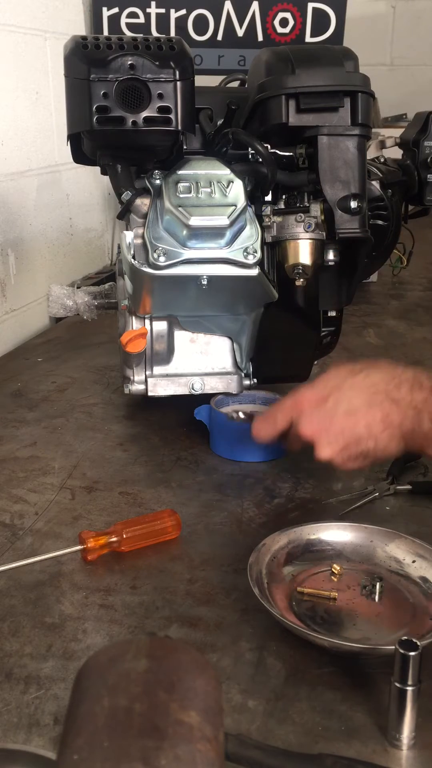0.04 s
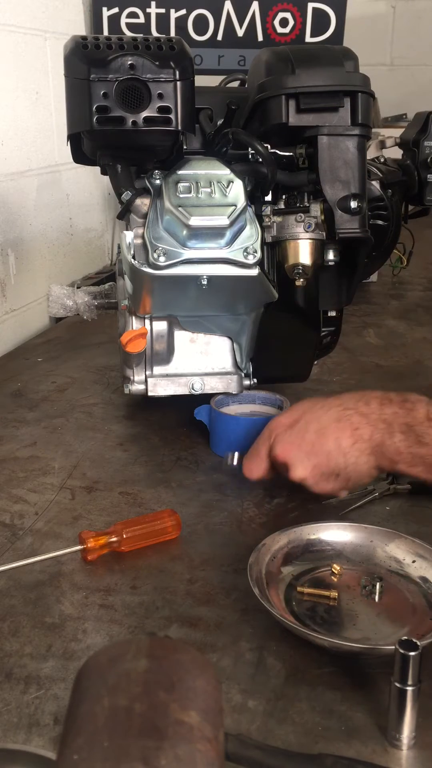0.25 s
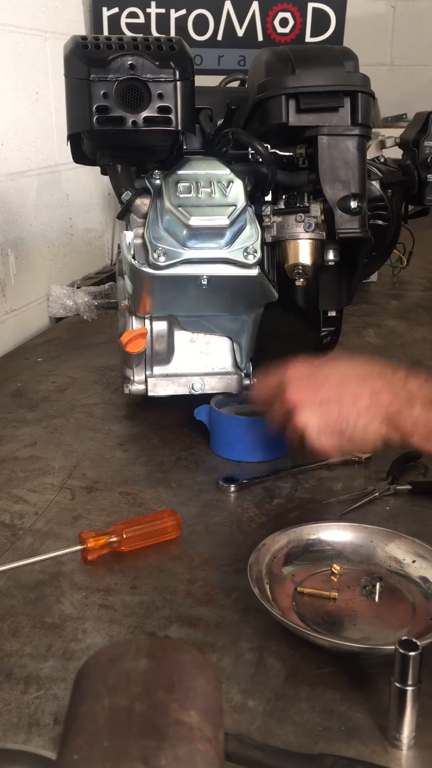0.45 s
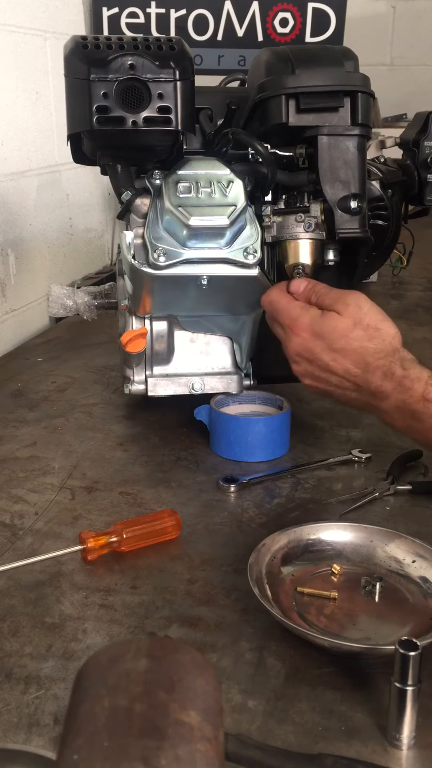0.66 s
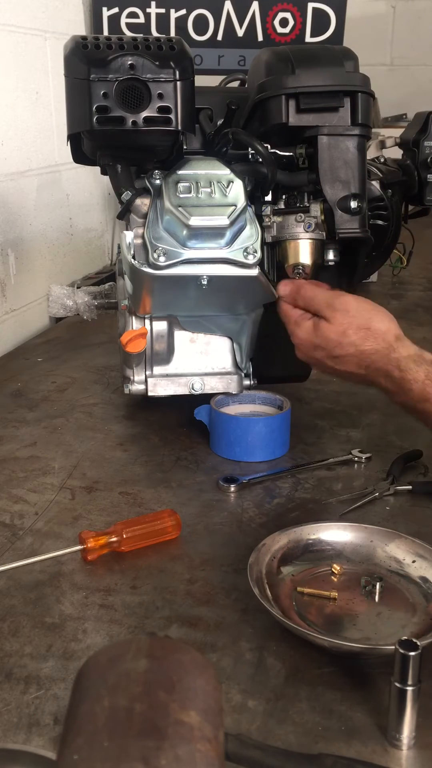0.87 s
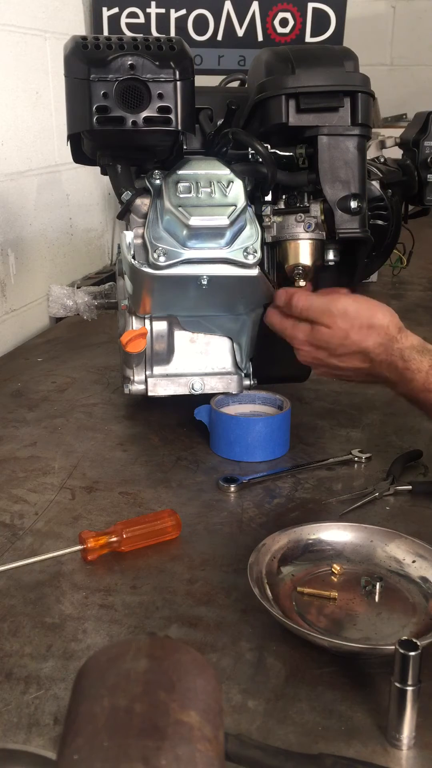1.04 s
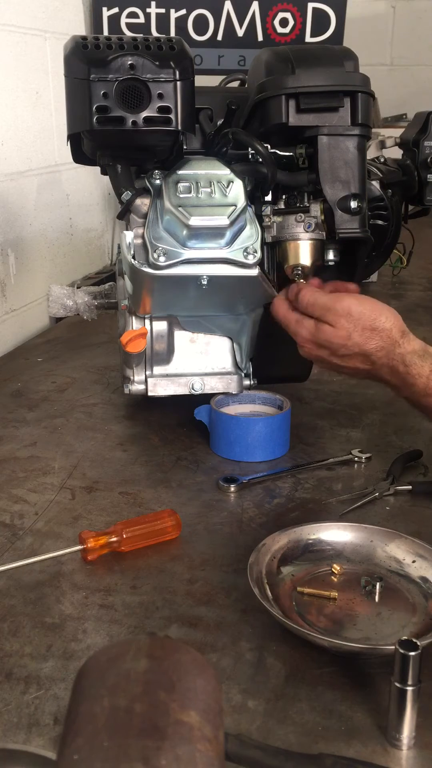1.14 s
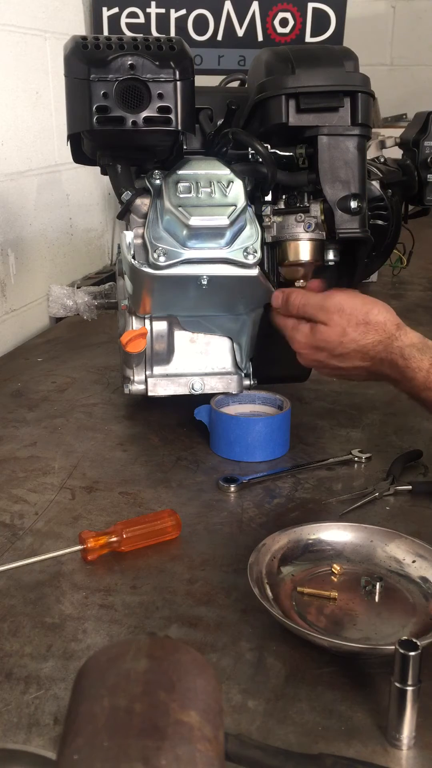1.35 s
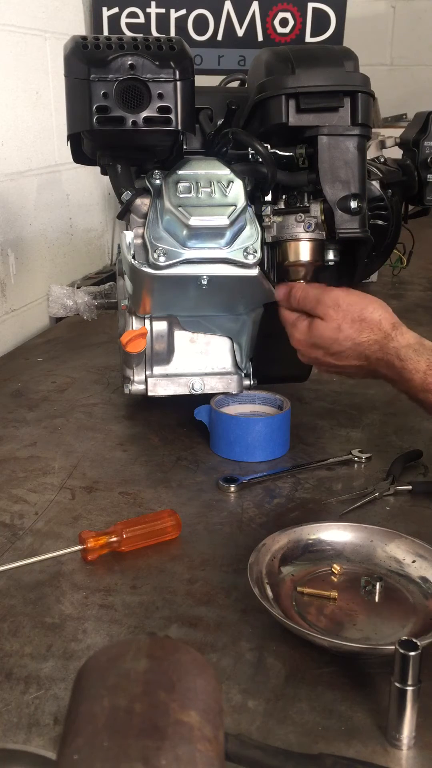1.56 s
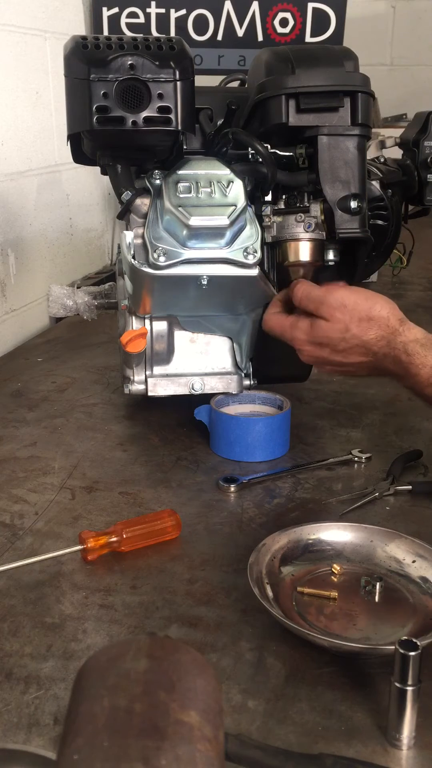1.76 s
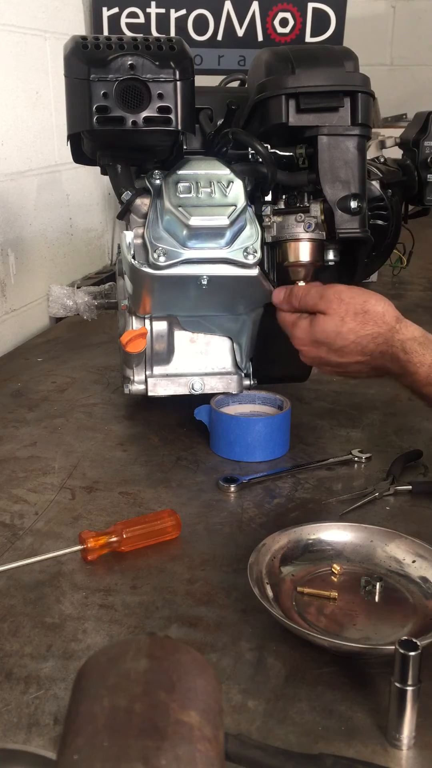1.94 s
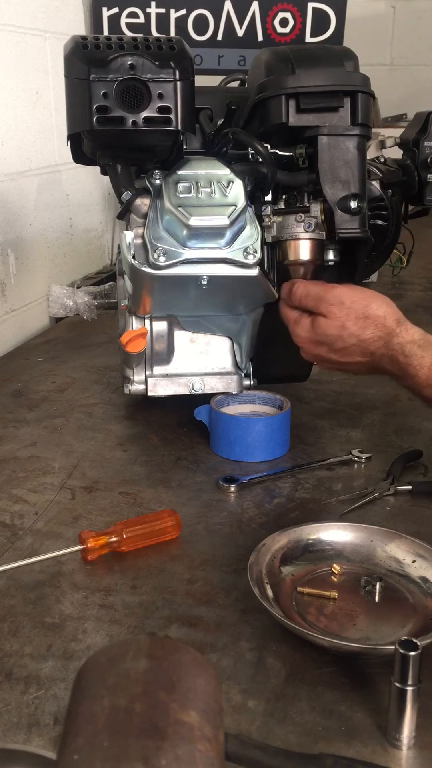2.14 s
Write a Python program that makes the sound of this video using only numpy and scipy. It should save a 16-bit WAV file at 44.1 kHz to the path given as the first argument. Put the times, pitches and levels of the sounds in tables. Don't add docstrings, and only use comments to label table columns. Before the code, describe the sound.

Wrench set down with a sharp double metal clank, followed by faint bolt-turning ticks and tinkles

```python
import sys
import numpy as np
from scipy import signal
from scipy.fft import rfft, irfft
from scipy.io import wavfile
from scipy.ndimage import uniform_filter1d

SR = 44100
rng = np.random.default_rng(int(sys.argv[2]) if len(sys.argv) > 2 else 0)


def convert_level_to_amplitude(level_db):
    exponent = np.asarray(level_db, float) / 20
    return 10 ** exponent


def wrap_up_sound(samples):
    columns = np.atleast_2d(samples).T
    tamed = np.clip(columns, -1, 1)
    steps = np.round(tamed * 32767).astype(np.int16)
    wavfile.write(sys.argv[1], SR, steps)


N = 97020

# f/Hz, level/dB, t60/s
BOWL_MODES = [(8260, -13, 0.07), (8600, -11.5, 0.11), (9180, -15, 0.036), (13000, -14.5, 0.045),
              (13100, -17, 0.088), (15000, -31, 0.035)]
HELD_S = 1.555


def unit(x):
    return x / np.sqrt(np.mean(x ** 2) + 1e-30)


def colour(x, points):
    f_hz = np.fft.rfftfreq(len(x), 1 / SR)
    point_hz, point_db = np.array(points).T
    gain = convert_level_to_amplitude(np.interp(np.log(f_hz + 1), np.log(point_hz), point_db, left=-90))
    return irfft(rfft(x) * unit(gain), len(x))


def narrow(hz, width_hz):
    edges_hz = [hz - width_hz / 2, min(hz + width_hz / 2, .45 * SR)]
    band = signal.butter(2, edges_hz, "band", fs=SR, output="sos")
    return unit(signal.sosfilt(band, rng.standard_normal(N)))


def ring(x, modes):
    out = 0
    for hz, db, t60_s in modes:
        pole = np.exp(2j * np.pi * hz / SR - np.log(1000) / (t60_s * SR))
        out = out + convert_level_to_amplitude(db) * signal.lfilter([1], [1, -pole], x).imag
    return out


def bursts(times_s, levels_db, decays_s):
    out = np.zeros(N)
    t = np.arange(2048) / SR
    noises = rng.standard_normal((len(times_s), len(t)))
    for s, db, decay_s, noise in zip(times_s, levels_db, decays_s, noises):
        spectrum = rfft(noise * np.exp(-t / decay_s))
        even = spectrum / np.sqrt(uniform_filter1d(abs(spectrum) ** 2, size=24))
        puff = irfft(even)[:len(t) // 2]
        puff = convert_level_to_amplitude(db) * puff / np.sqrt(np.sum(puff ** 2))
        i = int(s * SR)
        out[i:i + len(puff)] += puff[:N - i]
    return out


def strike(times_s, levels_db, hz, db, t60_s, detune, count=1):
    rise_s, scatter_db = 0.00093, 2
    out = np.zeros(N)
    t = np.arange(6000)[:, None] / SR
    hz, db, t60_s = np.repeat([hz, db, t60_s], count, axis=1)
    rise = 1 - np.exp(-t / np.maximum(rise_s, .5 / hz))
    fade = convert_level_to_amplitude(db - 60 * t / t60_s) * rise
    spots = rng.standard_normal((len(times_s), 3, len(hz)))
    for s, blow_db, (loudness, pitch, phase) in zip(times_s, levels_db, spots):
        waves = fade * np.sin(2 * np.pi * (hz * (1 + detune * pitch) * t + phase))
        i = int(s * SR)
        out[i:i + len(t)] += (waves @ convert_level_to_amplitude(blow_db + scatter_db * loudness))[:N - i]
    return out


def wrench():
    # t/s, crack level/dB, wrench level/dB, bench level/dB, crack decay/s
    touches = [
        (.2075, -18.5, -35.5, -33.5, 0.0016),
        (.2095, -16, -42.5, -25.5, .003),
        (.2113, -24.5, -27.5, -32.5, 0.002),
        (.2625, -31.5, -54, -40.5, .003),
    ]
    drops = [
        (.3715, -47.5, -61, -74, 0.0023),
        (0.3947, -3.5, -21, -30.5, 0.0021),
        (.4115, -4.5, -24, -18, 0.0056),
    ]
    # f/Hz, density/(dB per Hz)
    thud = [(180, -54), (400, -23.5), (1300, 0.5), (2300, -7), (3870, -10), (4350, -2.5), (5050, -9.5),
            (6570, -6), (15500, -38)]
    crack = [(180, -35), (300, -23), (600, -19), (1200, -4), (2700, -10), (5480, 2), (10000, -4.5),
             (15500, -17)]
    # f/Hz, level/dB
    soft_end_modes = [(2330, -3), (3430, 2.5), (4300, 3.5), (4480, 3), (5610, 3.5), (6570, 0), (7000, -8.5),
                      (7800, -6.5)]
    wrench_modes = [(3555, 1.5), (4003, 2.5), (4268, 9.5), (5134, -17.5), (5395, 7), (6000, -3),
                    (6750, -3.5), (7050, -1.5), (7767, 6), (8467, 5.5), (9570, -5), (10150, -8.5),
                    (11400, -14.5), (13620, 4)]
    bench_modes = [(160, -23), (230, -16.5), (305, -14.5), (470, -18.5), (560, -16), (750, -3), (910, -4),
                   (1050, -4), (1172, -5), (1280, 1), (1350, -7.5), (1500, -14), (2379, -7), (2842, -19.5)]
    t60_s, t60_cycles, detune = .035, 30, .008
    cracks, rings = 0, 0
    for rows, spectrum, tool_modes in ((touches, thud, soft_end_modes), (drops, crack, wrench_modes)):
        s, crack_db, tool_db, plate_db, decay_s = np.array(rows).T
        cracks = cracks + 10 * colour(bursts(s, crack_db, decay_s), spectrum)
        for blow_db, modes in ((tool_db, tool_modes), (plate_db, bench_modes)):
            hz, db = np.array(modes).T
            damping_s = np.maximum(t60_s, t60_cycles / hz)
            rings = rings + strike(s, blow_db, hz, db, damping_s, detune, count=2)
    return cracks, rings


def bowl():
    # t/s, level/dB, lowest mode f/Hz, t60/s, upper modes level/dB
    strikes = [(1.0723, -42.5, 3225, 0.21, -50), (1.2371, -23, 3237, 0.079, -33.5),
               (1.3033, -25.5, 3240, 0.2, -37), (1.3253, -25, 3260, .2, -34),
               (1.333, -23.5, 3290, 0.13, -31), (1.348, -25, 3273, 0.31, -44),
               (1.412, -33, 3314, 0.046, -38), (1.441, -68, 3260, 0.1, -48), (1.469, -38, 3214, 0.25, -47),
               (1.55, -64.5, 3245, 0.058, -68.5), (1.58, -46, 3310, 0.18, -50.5),
               (1.59, -50, 3230, 0.075, -61.5), (1.655, -54.5, 3282, 0.64, -63.5),
               (1.699, -45, 3340, 0.3, -61.5), (1.716, -44.5, 3268, 0.14, -53),
               (1.745, -68, 3275, 0.17, -69), (1.9482, -45.5, 3270, 0.051, -55),
               (1.979, -62, 3270, 1, -69.5), (1.999, -57.5, 3300, 0.96, -77), (2.022, -55, 3340, 0.07, -70),
               (2.111, -62.5, 3243, 0.17, -75), (2.152, -47.5, 3335, 0.35, -65),
               (2.1667, -50, 3260, 0.092, -24.5), (2.173, -38, 3248, 0.08, -43)]
    # t/s, level/dB
    top_strikes = [(1.073, -40), (1.2372, -38), (1.302, -33), (1.3261, -24), (1.349, -38), (1.414, -38),
                   (1.469, -40), (1.5, -45), (1.582, -53.5), (1.615, -57.5), (1.672, -47), (1.946, -46.5),
                   (2.174, -44), (2.178, -38)]
    free_rise_s, held_rise_s, grip_s = 0.0005, 0.0054, 0.0032
    waver, detune, top_from_hz = 0.0017, .005, 10000
    beat_hz, beat_share, beat_grows_s = 55.4, 0.34, 0.2
    t = np.arange(N) / SR
    s, db, hz, t60_s, upper_db = np.array(strikes).T
    row = np.clip(np.searchsorted(s, t) - 1, 0, None)
    age_s = t - s[row]
    size = (age_s > 0) * convert_level_to_amplitude(db[row] - 60 * np.maximum(age_s, 0) / t60_s[row])
    free = uniform_filter1d(size, max(int(free_rise_s * SR), 1))
    held = uniform_filter1d(size, max(int(held_rise_s * SR), 1))
    size = np.where(t < HELD_S, free, held)
    drift = unit(uniform_filter1d(rng.standard_normal(N), size=600))
    pitch_hz = uniform_filter1d(hz[row], max(int(grip_s * SR), 1)) * (1 + waver * drift)
    twin = np.clip(beat_share * age_s / beat_grows_s, 0, beat_share)
    beat = 1 + twin * np.cos(2 * np.pi * beat_hz * t)
    lowest = size * beat * np.sin(2 * np.pi * np.cumsum(pitch_hz) / SR)
    modes = np.array(BOWL_MODES)
    top = modes[:, 0] > top_from_hz
    upper = strike(s, upper_db, *modes[~top].T, detune)
    return lowest + upper + strike(*np.array(top_strikes).T, *modes[top].T, detune)


def bolt():
    # t/s, tick level/dB, block level/dB
    knocks = [(0.797, -51, -47.5), (0.9768, -53.5, -45), (1.0614, -44, -32.5), (1.2268, -33.5, -46),
              (1.2361, -38, -33), (1.3015, -33, -40.5), (1.3265, -36, -38), (1.334, -43, -36),
              (1.357, -50, -42.5), (1.388, -50, -47), (1.413, -50, -55), (1.442, -53, -52.5),
              (1.468, -51, -42), (1.577, -57, -48.5), (1.589, -58, -44.5), (1.6347, -76.5, -45.5),
              (1.6777, -71, -42.5), (1.7027, -80, -69.5), (1.912, -58.5, -53.5), (1.9471, -60, -49.5),
              (2.1555, -51.5, -46.5), (2.1676, -43.5, -50), (2.1738, -38.5, -52), (2.178, -38, -45),
              (2.1815, -44.5, -39), (2.188, -45, -46), (2.193, -53, -63)]
    # f/Hz, density/(dB per Hz)
    tick = [(240, -50), (400, -4.5), (3500, 2.5), (8500, -5.5), (10100, -16.5), (15500, -28.5)]
    # f/Hz, level/dB, t60/s
    block_modes = [(317.6, -18.5, 0.07), (583, -13, 0.055), (698, -4, 0.059), (880, -7.5, 0.027),
                   (1192, -4, 0.044), (1369.5, -8.5, 0.043), (1625, -2.5, 0.024), (1923, -6, 0.038),
                   (2653, -10, 0.015)]
    # t/s, level/dB
    effort = [(.87, -103.5), (0.949, -62.5), (1.03, -56.5), (1.069, -56), (1.151, -72), (1.251, -50.5),
              (1.328, -49), (1.43, -56.5), (1.489, -51.5), (1.562, -63.5), (1.6, -54.5), (1.727, -53.5),
              (1.77, -96.5), (1.88, -74), (1.951, -55), (2.05, -76), (2.139, -82), (2.191, -44)]
    # f/Hz, density/(dB per Hz)
    scrape = [(180, -22.5), (300, -10), (781, -2), (1220, 7), (3020, -3.5), (3340, 3), (4570, -13.5),
              (15500, -28.5)]
    tick_s, knock_t60_max_s, block_detune = .0035, .06, .015
    slips_per_s, spread_db, grain_s = 2500, 2, .0005
    block_db, bowl_db, scrape_db = -5.5, -11.5, -0.73
    loose_s, held_db = 1.225, -8
    rubbed_mode = (3260, -8, 0.054)  # f/Hz, level/dB, t60/s

    t = np.arange(N) / SR
    s, tick_db, knock_db = np.array(knocks).T
    hz, db, t60_s = np.array(block_modes).T
    ticks = 10 * colour(bursts(s, tick_db, np.full(len(s), tick_s)), tick)
    thumps = strike(s, knock_db, hz, db, np.minimum(t60_s, knock_t60_max_s), block_detune, count=2)

    slips = (rng.random(N) < slips_per_s / SR) * convert_level_to_amplitude(spread_db * rng.exponential(size=N))
    envelope = signal.lfilter([1], [1, -np.exp(-1 / (grain_s * SR))], slips)
    grains = unit(rng.standard_normal(N) * envelope)
    when_s, effort_db = np.array(effort).T
    force = grains * convert_level_to_amplitude(np.interp(t, when_s, effort_db, left=-120))

    def rub(modes, level_db):
        return ring(force, modes) * convert_level_to_amplitude(level_db) / np.std(ring(grains, modes))

    bowl_gate = (t > loose_s) * convert_level_to_amplitude(held_db * (t > HELD_S))
    bowl_rub = rub(BOWL_MODES + [rubbed_mode], bowl_db) * bowl_gate
    return ticks + thumps + rub(block_modes, block_db) + bowl_rub + convert_level_to_amplitude(scrape_db) * colour(force, scrape)


def slides():
    # t/s, length/s, centre f/Hz, width/Hz
    swish_rows = [
        (1.24, .3, 7000, 4500),
        (1.57, .19, 7500, 3500),
        (.93, .115, 13500, 5000),
        (.175, .035, 4500, 4000),
        (1.87, .11, 7500, 3500),
        (1.64, .12, 14000, 3000),
        (1.2, .03, 11000, 9000),
        (1.105, .058, 8500, 4500),
    ]
    swish_db = [-63.5, -71.5, -67.5, -65.5, -71, -71.5, -63.5, -69]
    # f/Hz, level/dB
    squeak = [(6440, -5), (7220, 2), (7720, -6), (8930, -7), (9680, -12), (10600, -18), (11900, -11),
              (12600, -16)]
    squeak_s, squeak_length_s, squeak_width_hz, squeak_db = 1.108, .052, 160, -63
    rows = [(*row, db) for row, db in zip(swish_rows, swish_db)]
    rows += [(squeak_s, squeak_length_s, hz, squeak_width_hz, squeak_db + db) for hz, db in squeak]
    t = np.arange(N) / SR
    out = 0
    for s, length_s, hz, width_hz, db in rows:
        arch = np.sin(np.pi * np.clip((t - s) / length_s, 0, 1))
        out = out + convert_level_to_amplitude(db) * arch * narrow(hz, width_hz)
    return out


def pings():
    # t/s, level/dB
    snaps = [(1.0606, -55.5), (1.2264, -31.5), (1.3011, -41), (1.3285, -40), (1.413, -61), (1.468, -67),
             (1.68, -62.5), (2.1689, -58.5), (2.1753, -50.5), (2.176, -45)]
    # f/Hz, density/(dB per Hz)
    snap = [(4000, -30.5), (6500, 0), (8500, 0.5), (10500, -7), (12800, 3.5), (15500, -7.5)]
    # t/s, f/Hz, t60/s
    parts = [(.3947, 9900, .04), (.4115, 10150, .03), (.4115, 13620, .05), (.797, 710, .09),
             (.797, 3600, .04), (.797, 8600, .035), (1.0614, 1500, .03), (1.1, 1600, .3), (1.33, 1392, .3),
             (1.47, 716, .25), (1.635, 2750, .08), (1.69, 646, .15), (1.7, 1900, .2), (1.705, 1600, .35),
             (1.91, 705, .3), (2.1735, 1650, .03), (2.178, 6100, .04), (2.178, 7600, .03)]
    part_db = [-22, -22, -20, -44, -40, -50, -32, -53, -42, -43, -53, -44, -53, -50, -52, -29, -42, -38]
    snap_s = 0.0028
    when_s, snap_db = np.array(snaps).T
    out = 10 * colour(bursts(when_s, snap_db, np.full(len(when_s), snap_s)), snap)
    t = np.arange(N) / SR
    for (s, hz, t60_s), db in zip(parts, part_db):
        age_s = np.maximum(t - s, 0)
        fade = convert_level_to_amplitude(db - 60 * age_s / t60_s) * (1 - np.exp(-age_s * hz / 2))
        out = out + fade * np.sin(2 * np.pi * hz * age_s)
    return out


def room(x):
    # f/Hz, t60/s, level/dB
    decay_table = [(150, 0.87, -29.5), (400, 0.7, -23.5), (1020, 0.7, -31.5), (2610, 1.046, -29.5),
                   (4640, 0.89, -36), (8850, 0.6, -37.5), (14000, 0.42, -35.5)]
    gap_s, early_db, early_t60_s = 0.004, 11, 0.14
    t = np.arange(SR) / SR
    table_hz, table_t60_s, table_db = np.array(decay_table).T
    tail = 0
    for hz in 100 * 2 ** np.arange(0, 7.6, .5):
        t60_s = np.interp(np.log(hz), np.log(table_hz), table_t60_s)
        db = np.interp(np.log(hz), np.log(table_hz), table_db)
        band = narrow(hz, hz / 3.0)[:SR] * np.sqrt(hz / SR / 2000)
        fade = convert_level_to_amplitude(-60 * t / t60_s) + convert_level_to_amplitude(early_db - 60 * t / early_t60_s)
        tail = tail + convert_level_to_amplitude(db) * band * fade
    return signal.fftconvolve(x, 10 * tail * np.clip(t / gap_s, 0, 1))[:N]


def floor():
    # f/Hz, density/(dB per Hz)
    hiss = [(15, -34), (25, 7.5), (79, -4.5), (445, -19), (495, -21.5), (826, -19), (1750, -33),
            (3170, -36), (15500, -44.5)]
    hiss_db, rumble_db, drone_db = -55, -56, -61
    swell_s, swell_width_s, swell_db = 2.06, .09, 8
    t = np.arange(N) / SR
    swell = swell_db * np.exp(-((t - swell_s) / swell_width_s) ** 2)
    out = convert_level_to_amplitude(hiss_db) * colour(rng.standard_normal(N), hiss)
    out = out + convert_level_to_amplitude(rumble_db) * narrow(hz=58, width_hz=5)
    return out + convert_level_to_amplitude(drone_db + swell) * narrow(hz=108, width_hz=30)


def scene():
    ring_room_db, hand_room_db, bowl_room_db = -7, -3, -10
    cracks, rings = wrench()
    hand = bolt() + slides()
    song = bowl()
    to_walls = cracks + convert_level_to_amplitude(ring_room_db) * rings + convert_level_to_amplitude(hand_room_db) * hand + convert_level_to_amplitude(bowl_room_db) * song
    return (cracks + rings + hand + song + pings() + room(to_walls) + floor())[None]


def roll_off(x):
    return signal.sosfilt(signal.butter(12, 15710, fs=SR, output="sos"), x)


def record(dry):
    low_hz, top_hz, ceiling = 46.3, 15600, 2.9
    x = signal.sosfilt(signal.butter(6, low_hz, "high", fs=SR, output="sos"), dry)
    x = ceiling * np.tanh(x / ceiling)
    x = signal.sosfilt(signal.ellip(8, .2, 70, top_hz, fs=SR, output="sos"), x)
    return roll_off(np.clip(x, -1, 1))


dry = scene()
out = record(dry)
wrap_up_sound(out)
```